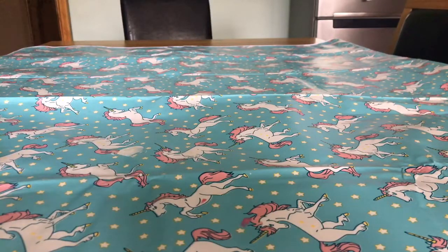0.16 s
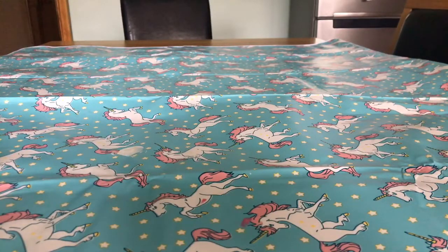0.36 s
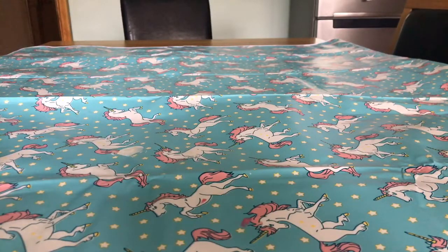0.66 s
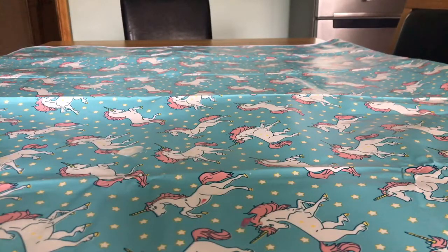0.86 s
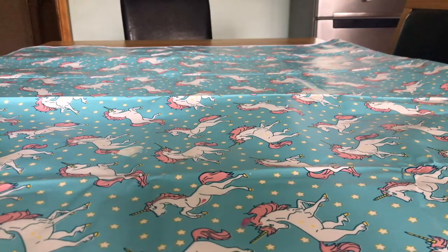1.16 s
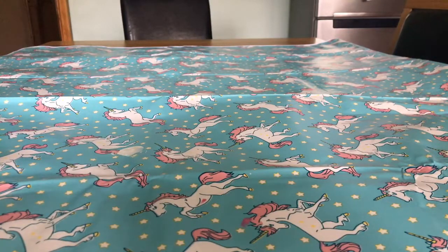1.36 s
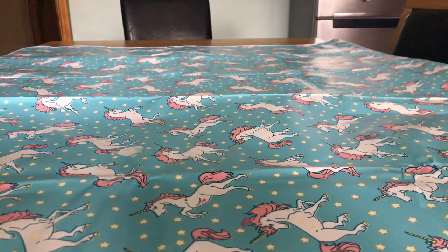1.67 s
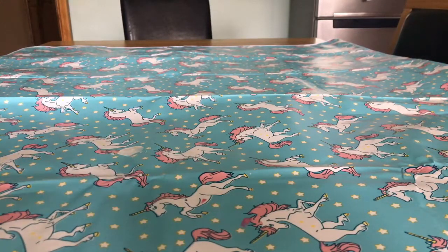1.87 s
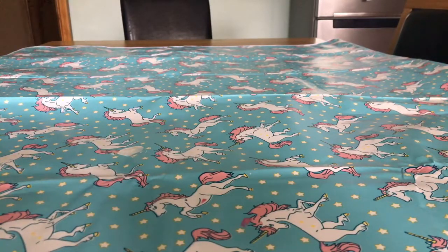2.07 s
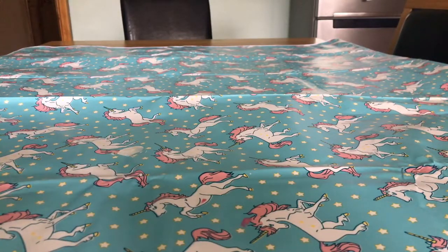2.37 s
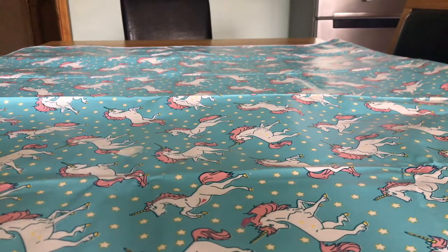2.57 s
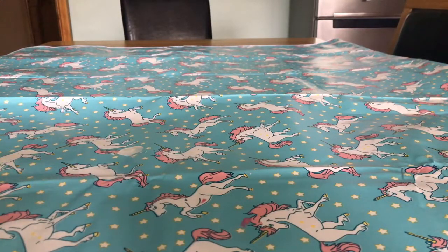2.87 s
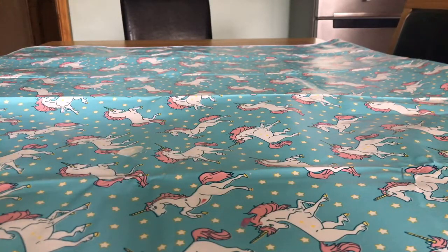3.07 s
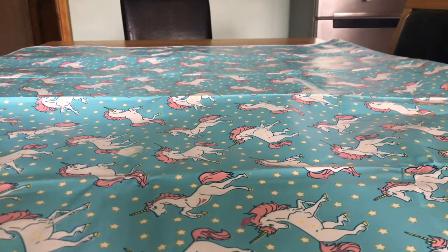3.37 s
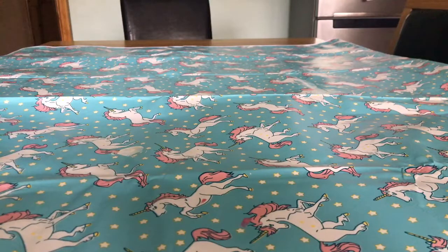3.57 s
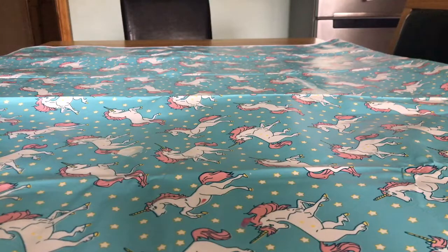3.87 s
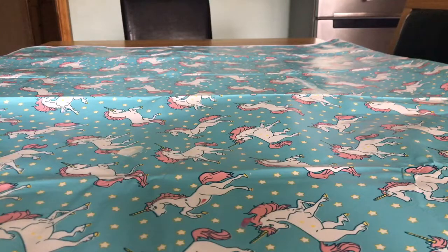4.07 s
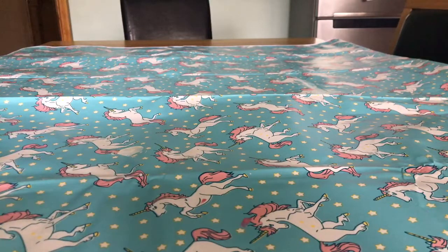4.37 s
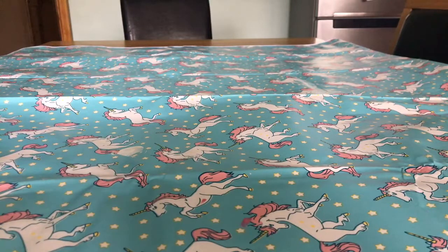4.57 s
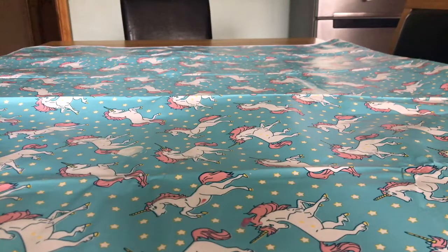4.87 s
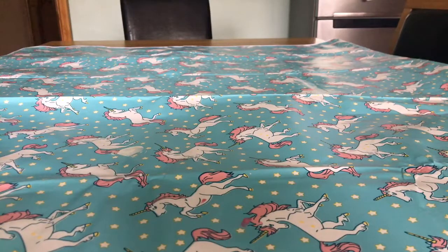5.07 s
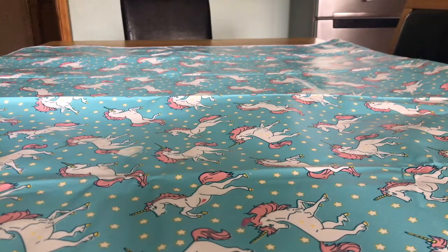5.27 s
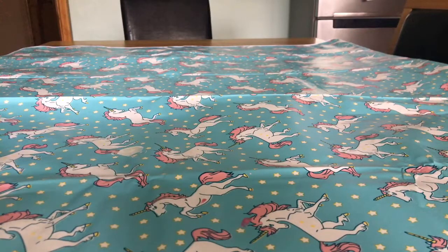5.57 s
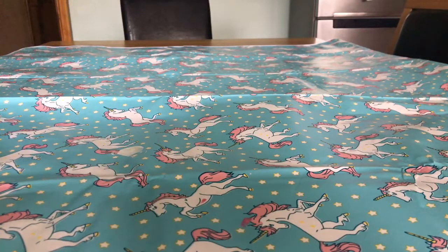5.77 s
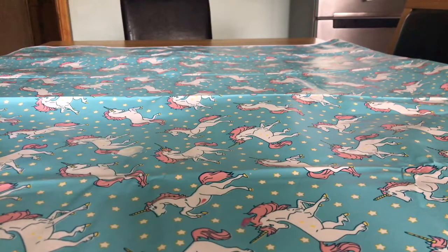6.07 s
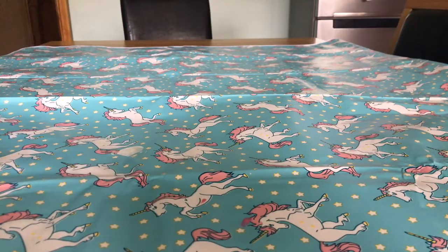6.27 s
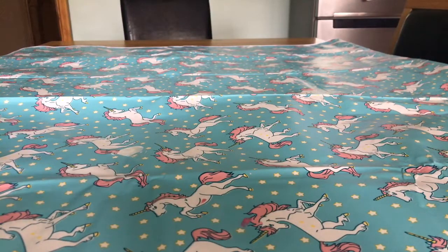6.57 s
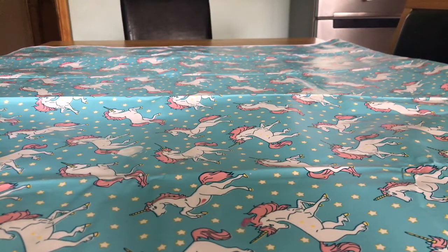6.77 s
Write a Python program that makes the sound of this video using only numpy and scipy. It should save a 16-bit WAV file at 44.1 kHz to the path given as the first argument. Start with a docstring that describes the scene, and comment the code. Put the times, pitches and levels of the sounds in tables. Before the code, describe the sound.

Stiff paper or sheet is handled close up on a table, with crisp snips and snaps, light crinkling, and soft low knocks indoors.

```python
"""Scissors and hands work a stiff sheet on a table close to a microphone, in a furnished room.
Small snaps and soft rustle open; two hard snaps follow near 0.85 and 1.14 s, then a quieter spell to 2 s.
Dense snaps follow, with another hard one near 5.16 s, and handling goes on to the end.
Snaps are shaped noise bursts, pushes swell crackling rustle, knocks are short low tones;
table rumble and room hush run below, and brief reflections follow the near sounds."""
import sys
import numpy as np
from scipy import signal
from scipy.io import wavfile
from scipy.ndimage import uniform_filter1d

SR = 44100
rng = np.random.default_rng(int(sys.argv[2]) if len(sys.argv) > 2 else 0)


def log_audio(samples):
    """Write samples as a 16-bit WAV file to the path given in sys.argv[1]."""
    # one column per channel
    frames = np.atleast_2d(samples).T
    # limit to full scale, then quantise
    limited = np.clip(frames, -1, 1)
    pcm = np.round(limited * 32767).astype(np.int16)
    wavfile.write(sys.argv[1], SR, pcm)


N = 305600

# snaps of the sheet: [peak_s, level_db, patch_pitch_hz, thud_re_level_db, sizzle_re_level_db,
#                      rise_to_half_ms, fall_to_half_ms]
SNAPS = [(0.026, -47, 2250, -24, -10, 6.3, 6), (0.0996, -46, 2840, -13, -2, 4.1, 3.5),
         (0.1246, -30.5, 2340, -3, -2.5, 1.4, 2), (0.1363, -34.5, 1860, -5.5, -2, 1.1, 2.5),
         (0.173, -39.5, 2150, -5, -3, 2.1, 7.7), (0.1995, -44.5, 2260, -3.5, -16, .8, 4.8),
         (0.287, -42, 2580, -6, -9, .5, 1.6), (0.3576, -46.5, 2440, 5.5, -3, 2.1, 3.3),
         (0.422, -50, 2400, 2, 0, 1, 1.5), (0.4783, -48.5, 2430, 7, -13, 1.5, 1.4),
         (0.6158, -45, 2390, -13, -6, 1.4, 2.7), (0.7839, -44, 4550, -6, -15, 5.3, 6.1),
         (0.8458, -13, 1480, -10.5, -7.5, 0.35, 4.1), (0.8684, -31.5, 1380, -6, -8, 1.9, 8.8),
         (0.898, -32, 1460, -14, -7, 3.4, 6.7), (0.9351, -22, 1630, -2.5, -15, .23, 1.9),
         (0.9597, -22.5, 1490, -4, -7, 4.5, 1.2), (0.9705, -24, 1580, -1.5, -11, 1, 0.81),
         (1.115, -33.5, 1460, -6, -16, 1.1, .5), (1.134, -21, 2480, -3, -17, .27, 1.7),
         (1.1366, -9.5, 1240, -4, -18.5, 1.37, 1.43), (1.1486, -23, 1370, -13, -12, 4.1, 3.3),
         (1.2886, -36, 5730, -18, -4, 1, 1.3), (1.332, -24.5, 1820, -5, -3.5, .18, 3.3),
         (1.365, -43.5, 1750, -8, 5, 3.9, 17), (1.4069, -36, 5290, -3, 2.5, .7, 5.4),
         (1.4349, -37, 2330, -6, 1.5, 4.7, 12.6), (1.6913, -37, 3020, -7, 2, 1, 0.76),
         (1.8211, -46.5, 3000, -1, -6, 1.5, 2.1), (1.913, -43, 1240, -0.5, -6, 2.5, 0.68),
         (1.95, -50, 4500, -10, 5, 1, 1.5), (1.968, -43.5, 2440, 1, -.5, 4.1, 2.9),
         (2.011, -48, 5000, -8, 4, 5, 3), (2.023, -42.5, 2500, -14, -2, 1.1, 2.1),
         (2.0427, -30.5, 2320, -12, -17, 0.16, 2.3), (2.0721, -31.5, 4460, -13, -2, 1.1, 1.8),
         (2.103, -31.5, 4000, -5.5, -4, 0.91, 2.9), (2.1254, -35, 2590, -11, -19, 1.5, 3.4),
         (2.1475, -34.5, 3840, -6, 2.5, 8.2, 2.7), (2.1995, -41, 2860, -6, -15, 6.2, 2.4),
         (2.2125, -30, 2700, -8, -8, .2, 1.9), (2.2786, -44, 4270, -18, 5, 1.2, 2.7),
         (2.2966, -37.5, 4200, -25, 9, 2.5, 5.1), (2.3106, -42, 4060, -30, 14, 1.1, 1.9),
         (2.342, -27.5, 3670, -5.5, -5, 1.3, 1.6), (2.3819, -27.4, 2790, -14, -6.5, 0.85, 2.3),
         (2.411, -32, 2940, -14, -23, 1.2, 1.6), (2.4246, -46.5, 1830, -10, 8, .72, 1.4),
         (2.449, -49, 4500, -10, 8.5, 0.73, 5), (2.527, -43, 5080, -5, 5, 1.6, 2.4),
         (2.5493, -40, 3460, -9, -1.5, 4, 1.3), (2.631, -35, 1360, -7, -11, .2, .62),
         (2.6905, -38.5, 2780, -9, -1, 0.84, 0.6), (2.7355, -39.5, 2750, -7, -7, 4.2, 1.4),
         (2.823, -30.5, 2490, 7.5, -16, 2.3, 0.47), (2.8315, -28, 2440, -12, -16, .57, 3.1),
         (2.888, -33, 1360, -5, -15, 0.18, 1.4), (2.9032, -43.5, 5260, 3, -4, 1, 3.6),
         (2.959, -43.5, 1720, -1, 1, 1.1, 2.7), (3.017, -35, 5250, -11, -1, 1.6, 3.2),
         (3.0672, -32.5, 1640, -4, -24, 0.44, 1.7), (3.1435, -44, 3000, -21, -9, 1.2, 2),
         (3.1718, -42, 2940, -4, 5, 2, 1.7), (3.228, -39.5, 1570, -3, -11, 0.65, 0.69),
         (3.247, -42, 4600, -14, 8, 4.3, 4.3), (3.259, -34, 5500, -16, -7, 4.6, 2),
         (3.289, -41, 3040, -6, -9, 5.4, 7.1), (3.304, -35, 3400, -11, -18, 5, 1.7),
         (3.3698, -24, 2700, -8.5, -14, 0.53, 1.64), (3.4813, -43.5, 2600, -6, -13, .7, 2.2),
         (3.6036, -43.5, 2470, -8, .5, .6, 8.2), (3.8102, -22.5, 2230, -27, -21, 0.24, 0.86),
         (3.829, -34.5, 2100, -4.5, -15, 0.67, 2), (3.8475, -28.5, 1690, -8.5, -13, 0.54, .72),
         (3.8616, -26, 1650, -18, -30, .6, 1.3), (3.8684, -33, 1630, -14, -17, .46, .8),
         (3.8775, -36, 1780, -6, -23, 2, 1.2), (4.025, -39, 2220, -3.5, -23, 0.79, 2.1),
         (4.108, -43, 1270, -9, -16, 2.3, 5.3), (4.1751, -43, 2440, -13, -12, 2.1, 3.1),
         (4.2543, -39.5, 2450, -21, -7, .93, 3.8), (4.3425, -39.5, 3940, -3, 2.5, 0.42, 1.2),
         (4.3649, -36.5, 4900, -10, -5, 1, 4.4), (4.3832, -40, 1460, -2, -4, 3.2, 1.6),
         (4.401, -35, 3630, -18, -10, 4.4, 3.2), (4.428, -34.5, 1670, -11.5, -10, 1.7, 2.5),
         (4.483, -33.8, 1800, -7.5, -10, 4.4, 1.5), (4.499, -26, 1280, -8, -16, 1, 1.7),
         (4.513, -28, 1910, -5, -5.5, 2.6, 3.3), (4.5344, -25, 1580, -14, -10, 1.6, 0.98),
         (4.666, -37, 1650, -3.5, -18, 4, 4.6), (4.693, -46, 1560, -7, -15, 1.3, 2.7),
         (4.892, -35.5, 1610, -5, -26, 3.6, 2.8), (4.926, -23.5, 1350, -19, -12, 1.6, 1.7),
         (4.937, -25.5, 1540, -10, -9, 0.67, 3.9), (4.9604, -31.5, 1420, -15, -5, 3.7, 2.2),
         (4.9741, -23.5, 1710, -15.5, -9, 2.5, 2), (5.009, -32.5, 2100, -22, -8, 1.7, 1.2),
         (5.1138, -36, 2780, -12.5, -27, 10.5, 3.5), (5.16, -13, 2040, -15, -12.5, 0.32, 1.7),
         (5.1804, -19, 2340, -6.5, -9.5, 1, 3.9), (5.1851, -24, 2400, -11, -5, 0.74, 1.5),
         (5.2263, -20, 1700, -19, -11.5, 1.2, 1.7), (5.288, -41, 1430, -8, -17, 5.5, 4.7),
         (5.301, -33, 2610, -10, -3, 1.5, 1.7), (5.34, -29.5, 2100, -21, -10, .2, 2.6),
         (5.403, -20.5, 1250, -30, -3, 0.26, 0.83), (5.419, -34, 2650, -1.5, -13, 2.1, 2),
         (5.479, -37, 2650, -14, -14, 7.7, 1.8), (5.5295, -34.5, 2740, -13.5, -12, 4.1, 4),
         (5.6242, -43.5, 1570, -6, -9, 3.3, 1.1), (5.846, -38.5, 2630, -10, -10, 0.71, 8.6),
         (5.8908, -43, 2150, -6.5, -4, 1.9, 8.6), (6.03, -40.5, 2520, -4.5, -24, 5.7, 14),
         (6.057, -29.5, 2220, -11.5, -28, 2.5, 1), (6.0701, -28, 1990, -14, -13, 0.67, 2.2),
         (6.0823, -30, 1710, -2.5, -11, .18, 1.3), (6.0992, -37, 2870, -5, -17, 2.6, 3.3),
         (6.1681, -27, 2530, -14, -15, 4.1, 1.4), (6.1905, -33, 2590, -11, -18, .8, 2.4),
         (6.2, -27, 2380, -14, -23, .2, 1.3), (6.335, -32.5, 1850, -6, -11, 0.24, 1.7),
         (6.4065, -33, 2180, 0.5, -4.5, 4.3, 4.7), (6.447, -22.5, 2570, -3.5, -12.5, 3.3, 5.2),
         (6.5494, -28.5, 1610, -8, -13, 1.5, .8), (6.573, -33, 3580, -5, -2, 4.9, 1.6),
         (6.5933, -28, 1700, -8, -9, 1.2, 3), (6.6103, -35, 3000, -3, -9, 2.8, 6.6),
         (6.6425, -28, 3680, -9, -8.5, 3.6, 2.7), (6.7671, -38.5, 2630, -6.5, -8, .97, 4.9),
         (6.777, -36, 1970, -12, -9.5, 0.91, 7), (6.872, -42.5, 940, -12, -28, 8, 12)]
# colour of low thud, fibre cracks and treble sizzle: [freq_hz, relative_db]
THUD_COLOUR = [(90, -38), (190, -2.5), (300, -0.5), (520, -1), (900, -6), (1600, -60)]
CRACK_COLOUR = [(500, -31.5), (950, 6.5), (1300, 12), (2500, 7.5), (4200, 11.5), (6000, 1), (9000, -14)]
SIZZLE_COLOUR = [(3500, -34.5), (6000, -1.5), (9000, -0.5), (13000, -7.5), (16000, -13)]


def snaps(patch_width_hz=900, uneven_db=2, fizz_width_hz=1600, fizz_db=-4.5):
    """Bursts of fibre cracks; part of the power rings in the buckling patch, a tiny patch fizzes in the sizzle."""
    rows = ticks() + SNAPS
    before = 1024  # samples ahead of the peak
    ms = np.arange(-before, 2048) / SR * 1000
    noise = rng.standard_normal((len(rows), 4, len(ms)))
    *cracks, sizes = noise.transpose(1, 0, 2)
    shapes = np.array([gain_of(swell_db(ms, rise_ms, fall_ms)) for *_, rise_ms, fall_ms in rows])
    uneven = gain_of(uneven_db * evened(uniform_filter1d(sizes, 20, axis=1)))
    cracks = np.array(cracks) * shapes * uneven
    fizz_hz = 6960 + (14100 - 6960) * rng.random(len(rows))
    broad = part(cracks[0], CRACK_COLOUR)
    thud = part(cracks[1], THUD_COLOUR)
    sizzle = part(cracks[0], SIZZLE_COLOUR)
    out = np.zeros(N + len(ms))
    for i, (peak_s, level_db, patch_hz, thud_db, sizzle_db, *_) in enumerate(rows):
        patch_share = np.clip(0.3 - 0.02 * sizzle_db, 0, 1)  # of power; dull snaps ring more
        patch = ring(cracks[2][i], np.full(len(ms), patch_hz), patch_width_hz)
        fizz = ring(cracks[2][i], np.full(len(ms), fizz_hz[i]), fizz_width_hz)
        burst = np.sqrt(patch_share) * evened(patch) + np.sqrt(1 - patch_share) * evened(broad[i])
        burst += gain_of(thud_db) * evened(thud[i])
        burst += gain_of(sizzle_db) * (evened(sizzle[i]) + gain_of(fizz_db) * evened(fizz))
        shape_rms = np.sqrt(np.mean(shapes[i] ** 2))
        out[round(peak_s * SR):][:len(ms)] += gain_of(level_db) * shape_rms * burst
    return out[before:before + N]


def ticks(count=45, over_rustle_db=6.5, spread_db=2, time_scale_ms=2.9):
    """Small snaps at chance moments, whose level and colour follow the rustle around them."""
    level_db, tilt_db, body_db = handling()
    place, pitch, size, rise, fall = rng.random((count, 5)).T
    at = ((np.arange(count) + place) / count * (N - 1)).astype(int)
    tick_db = level_db[at] + over_rustle_db + spread_db * (2 * size - 1)
    pitch_hz = 1400 * 3.2 ** pitch
    rise_ms, fall_ms = time_scale_ms * (0.25 + rise), time_scale_ms * (0.55 + fall)
    return list(zip(at / SR, tick_db, pitch_hz, -3 + body_db[at], -7 + tilt_db[at], rise_ms, fall_ms))


# dull and bright crackle colours: [freq_hz, relative_db]
LOW_CRACK_COLOUR = [(500, -18.5), (950, -7.5), (1400, -1), (2500, -4), (3400, -12), (5500, -20)]
HIGH_CRACK_COLOUR = [(1200, -14), (2200, -7.5), (3200, -3.5), (4400, 0), (6000, -4), (9000, -15.5)]


def rustle(per_s=6000, spread_db=1.5, shared_db=2.0, own_db=1.5, clump_s=0.0045,
           crease_db=-7, crease_s=0.008, crease_width_hz=600):
    """Many small crackles of uneven size, clumped as creases give way; each crease has its own pitch."""
    level_db, tilt_db, body_db = handling()
    sizzle_db = -3.5 + 0.5 * tilt_db  # a bright push has more sizzle
    size = gain_of(spread_db * np.minimum(rng.exponential(1, N), 4))
    size = size * (rng.random(N) < per_s / SR)
    size = size * gain_of(shared_db * clumps(clump_s))

    def crackle(re_level_db):
        """Gives the shared crackle moments their own noise, clumping and level."""
        grains = size * rng.standard_normal(N) * gain_of(own_db * clumps(clump_s))
        return gain_of(level_db + re_level_db) * evened(grains)

    low, high = crackle(-tilt_db / 2), crackle(tilt_db / 2)
    body, sizzle = crackle(body_db), crackle(sizzle_db)
    crease_index = np.cumsum(rng.random(N) < 1 / (crease_s * SR))
    crease = rng.random((N, 2))[crease_index].T
    pitched = ring(low, 1100 + 1600 * crease[0], crease_width_hz)
    pitched += ring(high, 2500 + 2500 * crease[1], crease_width_hz)
    broad = part(low, LOW_CRACK_COLOUR) + part(high, HIGH_CRACK_COLOUR)
    broad += part(body, THUD_COLOUR) + part(sizzle, SIZZLE_COLOUR)
    return broad + gain_of(crease_db) * pitched


def clumps(seconds):
    """Twice-smoothed noise that bunches the crackles."""
    width = int(seconds * SR)
    return evened(uniform_filter1d(uniform_filter1d(rng.standard_normal(N), width), width))


# pushes of the hands: [peak_s, level_db, rise_to_half_ms, fall_to_half_ms, brightness_db, body_re_level_db]
PUSHES = [(0.02, -49, 47, 42, -0.5, -2), (0.117, -45.5, 53, 46, 5.5, -7.5), (0.374, -52.5, 56, 81, 1.5, -3),
          (0.546, -53, 35, 110, -2, -3.5), (0.711, -52.5, 37, 27, -1, 4), (0.791, -53, 20, 13, -4, 8),
          (0.863, -34, 12, 22, -7.5, 1.5), (0.955, -44.5, 25, 77, -1.5, -12), (1.15, -43, 17, 124, -4, 1),
          (1.35, -41.5, 13, 61, 4.5, -5.5), (1.435, -50.5, 30, 28, -2, -2), (1.7, -63.5, 60, 54, -2, -2),
          (2.05, -57, 130, 56, -1, 2.5), (2.143, -42.5, 31, 44, -0.5, -4), (2.295, -48, 16, 63, 18, -10),
          (2.395, -46, 79, 39, 0, -4), (2.542, -56, 33, 170, 5.5, -0.5), (2.736, -51.5, 13, 51, 7, -3),
          (2.829, -47.5, 11, 105, -1, -9), (3.03, -54.5, 30, 90, 1, 4), (3.163, -49.5, 20, 18, 6.5, -7),
          (3.255, -49, 29, 55, 3.5, -4), (3.39, -52, 25, 47, -2.5, -2), (3.61, -63, 4, 25, 3, -2),
          (3.692, -55, 38, 70, 15, -13), (3.864, -50.5, 43, 39, -6, -4), (4.036, -56, 20, 35, -6.5, -3),
          (4.105, -56, 19, 25, -9, -2), (4.175, -48.5, 12, 16, -1, -4), (4.26, -48.5, 14, 29, -6, -7),
          (4.385, -51.5, 64, 39, 0, -1.5), (4.515, -53, 26, 82, 4, -2), (4.68, -54.5, 35, 40, -3, 3),
          (4.775, -51, 55, 59, -3.5, -2.5), (4.959, -45, 18, 47, 2, -3), (5.113, -45, 18, 38, -1.5, -12),
          (5.178, -36, 18, 54, -1.5, -2.5), (5.3, -44.5, 37, 96, 2, -8.5), (5.4, -47.5, 40, 82, 7, -9),
          (5.535, -51, 47, 47, 3, -1), (5.65, -57.5, 31, 51, -2, 0.5), (5.852, -54.5, 5.3, 200, 6, -6),
          (6.01, -49.5, 6, 40, 0, 5), (6.074, -45.5, 36, 34, 0, -7), (6.186, -50, 30, 58, -3.5, 0),
          (6.433, -45.5, 27, 150, -2.5, 0), (6.632, -52.5, 50, 83, 17, -4),
          (6.78, -51.5, 7.4, 51, 10, -14.5), (6.859, -46, 30, 37, 3, -1.5)]


def handling(rest_db=-68):
    """Level, brightness and body of the rustle: pushes add in power, and the strongest weigh most in the colour."""
    ms = np.arange(0, N + 64, 64) / SR * 1000
    power = np.array([gain_of(2 * (level_db + swell_db(ms - peak_s * 1000, rise_ms, fall_ms)))
                      for peak_s, level_db, rise_ms, fall_ms, *_ in PUSHES])
    total = power.sum(0) + gain_of(2 * rest_db)
    tilt_db, body_db = np.array(PUSHES)[:, 4:].T @ power / total
    sample_ms = np.arange(N) / SR * 1000
    return [np.interp(sample_ms, ms, curve) for curve in (10 * np.log10(total), tilt_db, body_db)]


# knocks on the table top: [peak_s, level_db, pitch_hz]
KNOCKS = [(0.131, -31.5, 121), (0.434, -40, 95), (0.483, -38, 131), (0.735, -36.5, 139), (0.791, -37, 108),
          (0.857, -21.5, 99), (0.965, -38, 111), (1.14, -27, 168), (1.337, -31.5, 151), (1.413, -44, 133),
          (1.441, -42, 122), (2.156, -41, 114), (2.346, -34, 143), (2.826, -25, 170), (2.839, -28, 155),
          (2.897, -33, 111), (3.028, -38, 118), (3.148, -44, 123), (3.221, -37.5, 128), (3.387, -39, 99),
          (3.855, -40, 128), (4.517, -44, 113), (5.105, -43.5, 124), (5.167, -36, 117), (5.19, -31, 145),
          (5.28, -43, 96), (5.422, -32, 167), (5.49, -40, 115), (6.011, -35, 106), (6.096, -38, 117),
          (6.412, -35.5, 130), (6.46, -32.5, 94.5), (6.613, -38, 92), (6.86, -39.5, 90)]


def knocks(frame_hz=62, frame_db=-6, frame_fall_ms=9):
    """Each knock pushes the table top for a cycle or two; the frame below rings on, lower and longer."""
    before = 2048  # samples ahead of the peak
    ms = np.arange(-before, 8192) / SR * 1000
    out = np.zeros(N + len(ms))
    phases_turns = rng.random((len(KNOCKS), 2))
    for (peak_s, level_db, pitch_hz), (top_turn, frame_turn) in zip(KNOCKS, phases_turns):
        rise_ms, fall_ms = 0.53 * 1000 / pitch_hz, 0.59 * 1000 / pitch_hz  # cycles to half height
        top = np.cos(2 * np.pi * (pitch_hz * ms / 1000 + top_turn))
        top *= gain_of(swell_db(ms, rise_ms, fall_ms))
        frame = np.cos(2 * np.pi * (frame_hz * ms / 1000 + frame_turn))
        frame *= gain_of(frame_db + swell_db(ms, rise_ms, frame_fall_ms))
        out[round(peak_s * SR):][:len(ms)] += gain_of(level_db) * (top + frame)
    return out[before:before + N]


# colour of the table rumble: [freq_hz, relative_db_per_hz]
SHAKE_COLOUR = [(12, -47), (20, -26), (45, -3), (64, 7.5), (155, -6.5), (189, -0.5), (253, -1), (300, -11),
                (390, -55), (660, -120)]


def table(offset_db=-3, follow_db_per_db=0.72, middle_db=-58):
    """Low noise of the table top, whose level follows the pushes on the sheet."""
    level_db, _, body_db = handling()
    shake_db = offset_db + middle_db + follow_db_per_db * (level_db + body_db - middle_db)
    return gain_of(shake_db) * part(rng.standard_normal(N), SHAKE_COLOUR)


def room(x, turn_hz=3.3):
    """Three sets of random reflections fade in and out in a steady rotation, so the tail keeps changing."""
    turn = 2 * np.pi * turn_hz * np.arange(N) / SR
    out = np.zeros(N)
    for k in range(3):
        feed = x * np.sqrt(2 / 3) * np.cos(turn + k * np.pi / 3)
        out += signal.fftconvolve(feed, reflections())[:N]
    return out


# decay of the room: [freq_hz, t60_s]
ROOM_DECAY = [(120, 0.47), (870, 0.36), (2300, 0.22), (6000, 0.35), (14000, 0.46)]


def reflections():
    """Sparse reflections of random sign, each band dying at its own speed."""
    taps = np.zeros(SR)
    at = np.arange(120, SR - 16, 16)
    taps[at + rng.integers(0, 16, len(at))] = rng.choice([-1., 1.], len(at))
    hz, t, bands = signal.stft(taps, SR, nperseg=256)
    decay_db = -60 * t / read(ROOM_DECAY, hz)[:, None]
    tail = signal.istft(bands * gain_of(decay_db), SR, nperseg=256)[1]
    return tail / np.linalg.norm(tail)


# colour of the room hush: [freq_hz, relative_db_per_hz]
AIR_COLOUR = [(15, -13.5), (25, -12.5), (153, 22.5), (545, -7), (988, -7), (1260, -17.5), (2480, -19),
              (7710, -8), (9070, -15), (16000, -27)]


def hush(level_db=-60):
    """Steady coloured noise of the room."""
    return gain_of(level_db) * part(rng.standard_normal(N), AIR_COLOUR)


def swell_db(ms, rise_ms, fall_ms):
    """A rounded rise to the peak at zero, then a steady fall in dB."""
    return -6 * np.where(ms < 0, (ms / max(rise_ms, 0.1)) ** 2, ms / max(fall_ms, 0.1))


def ring(x, hz, width_hz):
    """Two resonances in a row, scaled so that white noise keeps its level."""
    twice = resonate(resonate(x, hz, width_hz), hz, width_hz)
    return twice / np.sqrt(np.pi * width_hz / SR / 2)


def resonate(x, hz, width_hz):
    """Shifts the curve hz down to zero, smooths, and shifts back: a resonance of gain 1."""
    turn = np.exp(2j * np.pi * np.cumsum(hz) / SR)
    r = np.exp(-np.pi * width_hz / SR)
    smooth = signal.lfilter([1 - r], [1, -r], x / turn + 1e-18)
    return 2 * (turn * smooth).real


def part(x, points):
    """Colours x so that white noise keeps its level."""
    closed = [(1, -90)] + list(points) + [(SR / 2, -90)]
    y, level = colour(x, lambda hz: read(closed, hz))
    return y / level


def colour(x, db_at, size=4096):
    """Causal filter from a dB curve, its phase following from the log gain; also returns the noise gain."""
    curve_db = db_at(abs(np.fft.fftfreq(size, 1 / SR)))
    log_gain = np.log(gain_of(np.maximum(curve_db, -100)))
    taps = np.fft.ifft(np.exp(np.conj(signal.hilbert(log_gain)))).real[:size // 2]
    y = signal.oaconvolve(np.atleast_2d(x), taps[None], axes=1)
    return y[:, :x.shape[-1]].reshape(x.shape), np.linalg.norm(taps)


def read(points, hz):
    """Reads a table along log frequency."""
    f, value = np.transpose(points)
    return np.interp(np.log(hz + 1), np.log(f + 1), value)


def gain_of(db):
    """Amplitude gain from dB."""
    return 10 ** (np.asarray(db) / 20)


def evened(x):
    """Scales x to an RMS of 1."""
    return x / np.sqrt(np.mean(x ** 2) + 1e-20)


def scene():
    """Near paper and knocks, their room reflections, table rumble and hush."""
    near = snaps() + rustle() + knocks()
    return (near + gain_of(-10.0) * room(near) + table() + hush())[None]


# peaks and dips of a microphone close above the table: [freq_hz, width_hz, gain_db]
TABLE_REFLECTION = [(1240, 240, 0.5), (2505, 150, 3.5), (4700, 330, 1), (4830, 870, -4), (7730, 680, -4),
                    (10440, 890, -7)]


def record(dry, rumble_cut_hz=19, edge_hz=15850):
    """The table's reflection adds peaks and dips; the microphone drops the deepest bass; then the band limit."""
    def reflection_db(hz):
        """Sum of the peaks and dips at hz."""
        return sum(gain_db / (1 + ((hz - f) / width_hz * 2) ** 2) for f, width_hz, gain_db in TABLE_REFLECTION)

    heard = colour(dry[0], reflection_db)[0]
    heard = signal.sosfilt(signal.butter(2, rumble_cut_hz, "high", fs=SR, output="sos"), heard)
    band = signal.firwin(511, edge_hz, window=("kaiser", 9), fs=SR)
    return signal.oaconvolve(heard, band, "same")[None]


dry = scene()
out = record(dry)
log_audio(out)
```